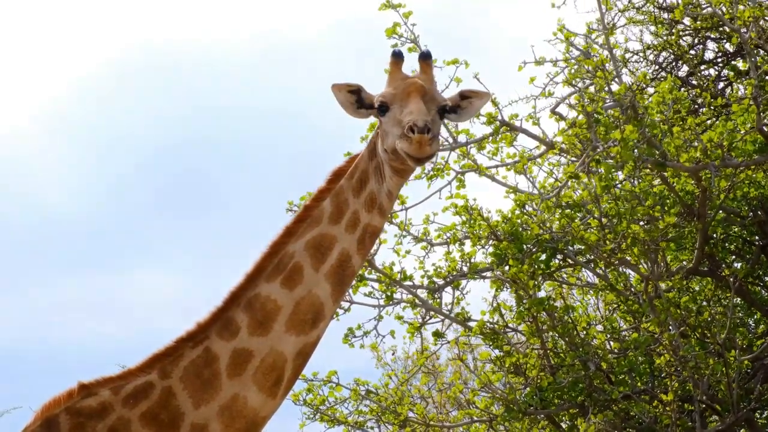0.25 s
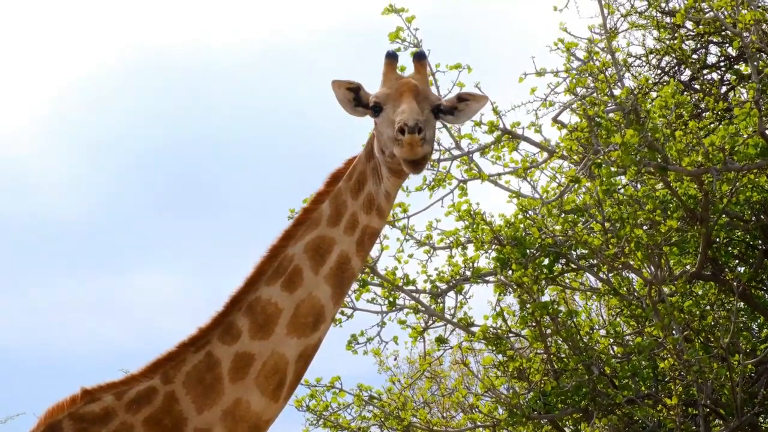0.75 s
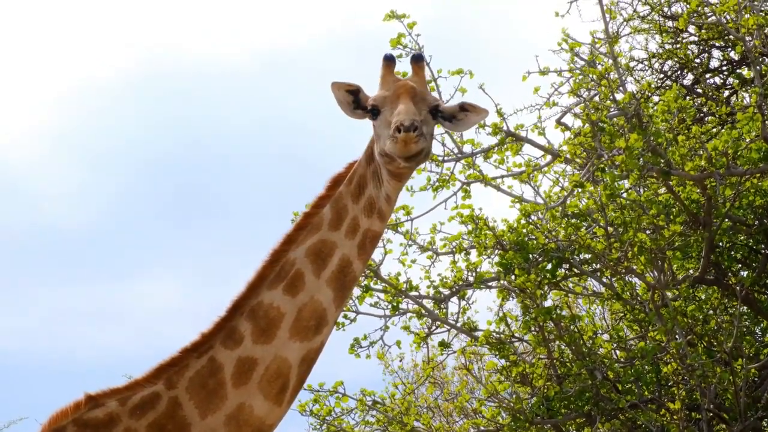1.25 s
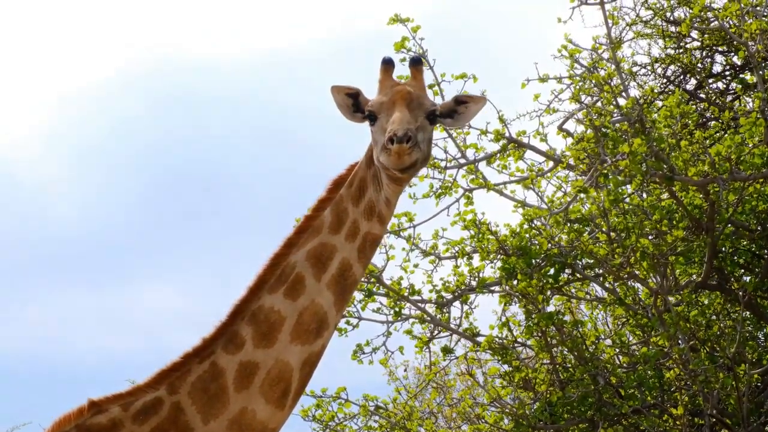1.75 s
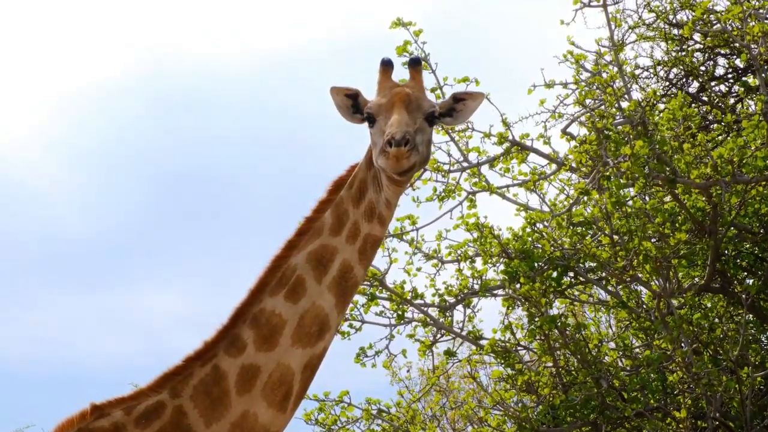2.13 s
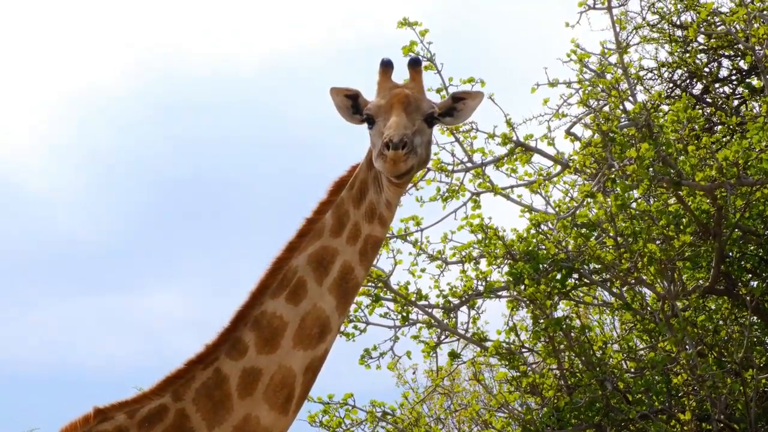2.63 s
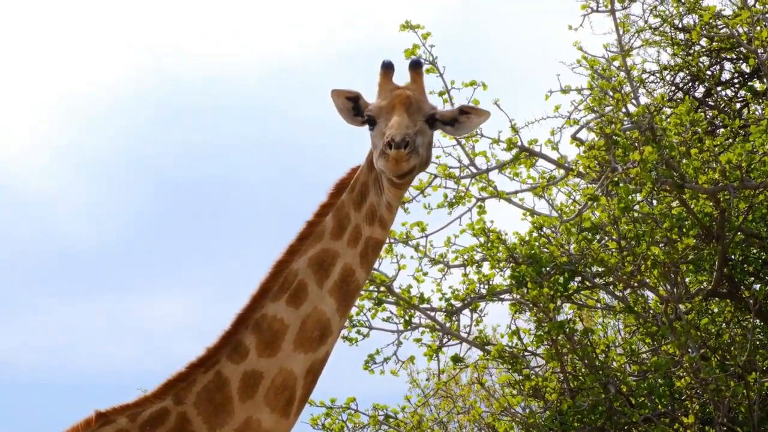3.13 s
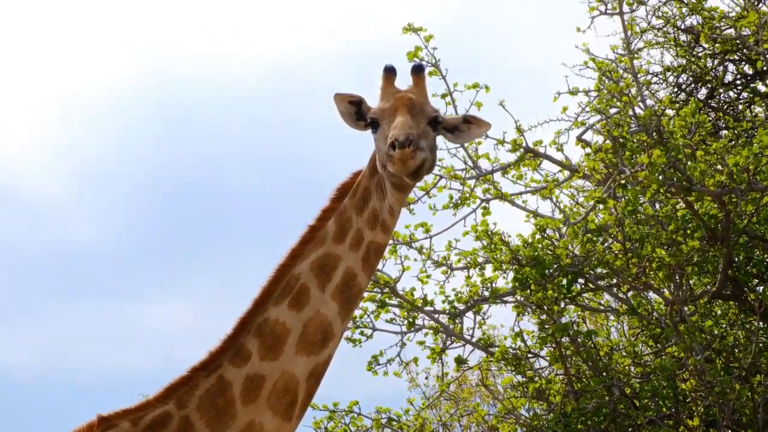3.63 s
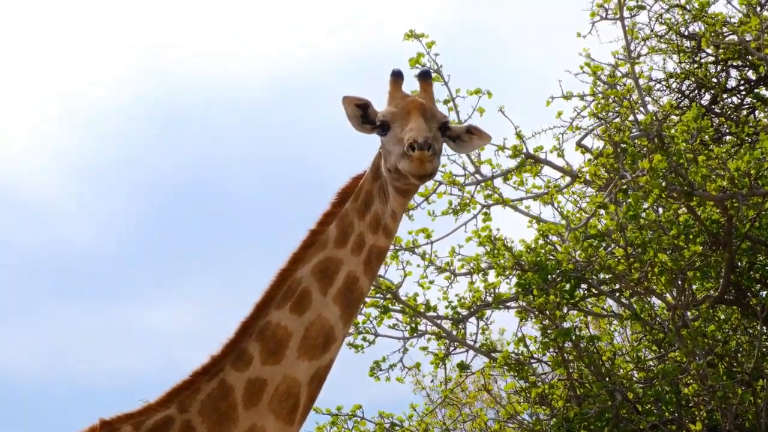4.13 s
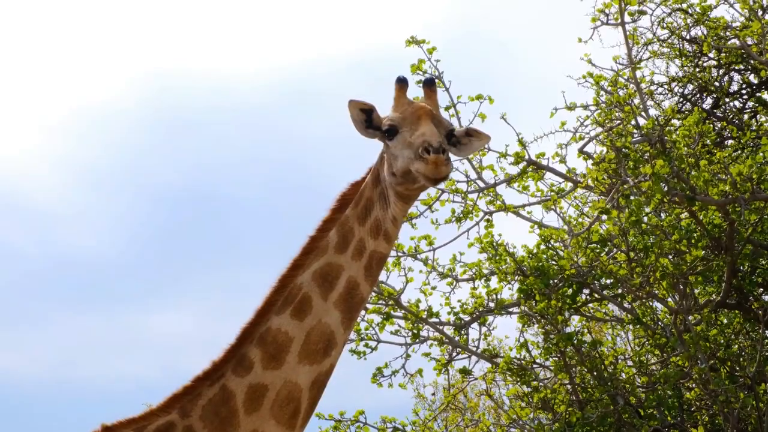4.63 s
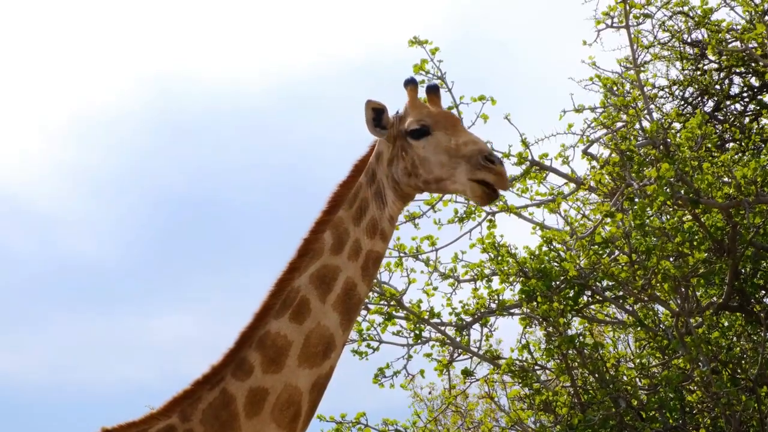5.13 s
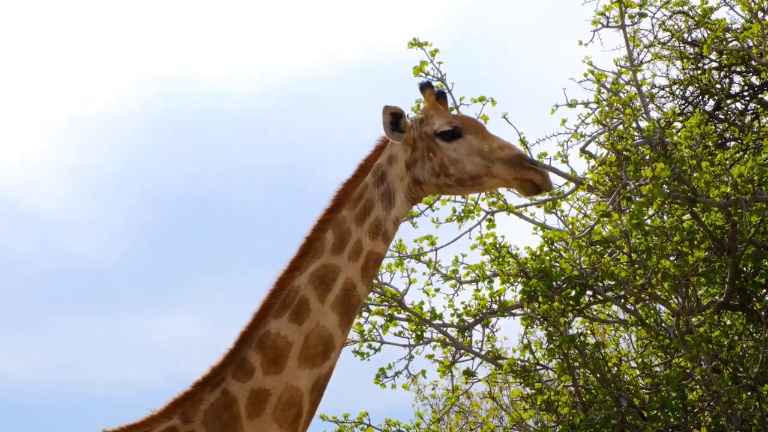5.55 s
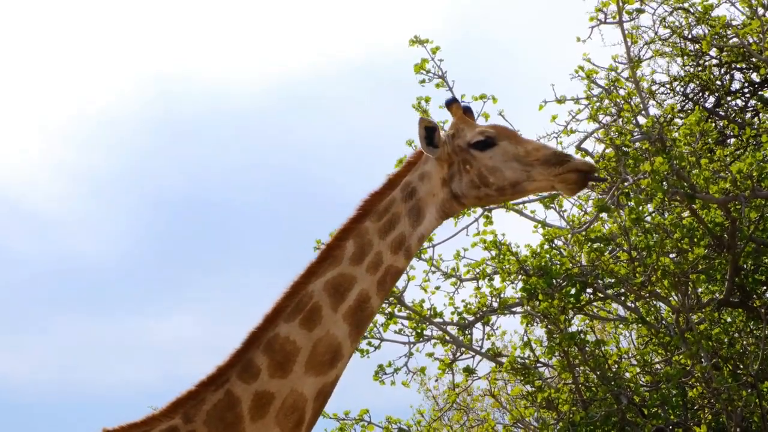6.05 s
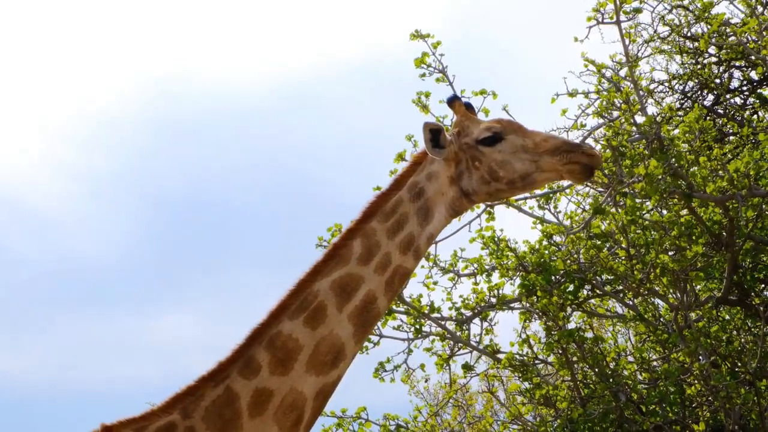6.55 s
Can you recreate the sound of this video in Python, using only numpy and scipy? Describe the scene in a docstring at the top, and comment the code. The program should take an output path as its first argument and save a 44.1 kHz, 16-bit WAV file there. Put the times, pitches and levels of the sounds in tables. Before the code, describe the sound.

A giraffe chews leaves and twigs very close to the microphone outdoors. Crackly rustling comes in quick uneven swells, with sharp ringing twig snaps, small mouth pops and dull molar crunches. The loudest cracks fall in the first two and a half seconds; then it thins to sparse ticks, with one short crunchy burst midway, and rustles again at the end. Soft low wind, faint hum and hiss lie beneath.

```python
"""Leaves rustle in swells of small crackles as a large browsing animal strips and chews them close by, outdoors.
Crackles are short bursts of noise, each around a pitch of its own; stalks and twigs snap as ringing bursts.
The jaws give dull pops (pressure pulses) and crunches (decaying noise in a resonant hollow).
Below lie a soft wind rumble with one gust, a faint hum, hiss (all shaped noise) and a thin high sine whine.
Wind rumble, hum and whine sink near the end."""
import sys
import numpy as np
from scipy import signal
from scipy.fft import rfft, irfft
from scipy.io import wavfile

SR = 44100
rng = np.random.default_rng(int(sys.argv[2]) if len(sys.argv) > 2 else 0)


def to_wav(sig):
    """Store sig (one row per channel, or 1-D mono) as 16-bit WAV at the path in sys.argv[1].

    Samples outside -1..1 are clipped; the rate is SR.
    """
    pcm = np.clip(np.atleast_2d(sig), -1, 1) * 32767
    pcm = np.round(pcm).astype(np.int16)
    wavfile.write(sys.argv[1], SR, pcm.T)  # frames by channels


N = 298998

# leaves crumpling, one swell each: [middle t/s, peak level before brightening/dB, length/s, brightness/dB]
LEAF_SWELLS = [(.06, -55, 0.68, 3.5), (0.212, -50.5, 0.13, -2), (.33, -63.5, 0.2, -0.5),
               (0.408, -57, 0.18, -6), (0.681, -60.5, 0.1, -3), (0.814, -47.5, 0.15, 0.5),
               (0.991, -51, 0.19, 3.5), (1.045, -55.5, 0.11, 0.5), (1.111, -53.5, 0.15, 3),
               (1.194, -51.5, 0.079, 3.5), (1.307, -47.5, 0.22, 1), (1.401, -47, 0.055, -1),
               (1.451, -49.5, 0.3, 2.5), (1.667, -47.5, 0.14, 1), (1.844, -54.5, 0.18, 5),
               (1.941, -58.5, 0.14, 8), (2.018, -51, 0.098, 2.5), (2.19, -50.5, 0.34, 2),
               (2.322, -50, 0.24, 2), (2.574, -43, 0.12, -4.5), (2.796, -59, 0.44, 0.5),
               (2.89, -54.5, 0.027, 1.5), (3.05, -70, 0.24, -6), (3.326, -61.5, 0.11, 5.5),
               (3.435, -51.5, 0.16, 4), (3.563, -60, 0.18, 14.5), (3.66, -62, 0.13, 6),
               (3.816, -59.5, .22, -1), (4.013, -62, 0.19, -1.5), (4.174, -52.5, .18, -2.5),
               (4.327, -60, 0.34, 10.5), (4.563, -60.5, 0.15, 0.5), (4.788, -59.5, 0.29, -5),
               (4.879, -60, .1, 8.5), (5.001, -60, 0.073, -8), (5.206, -59, 0.46, 5),
               (5.46, -66.5, 0.36, -1), (5.708, -67, 0.27, -4), (6.12, -59, 0.68, 3),
               (6.418, -49, 0.16, 1.5), (6.488, -57, .12, 2), (6.596, -49, 0.24, 1),
               (6.763, -51, 0.12, 3.5)]
# spectral density of the leaves before brightening: [f/Hz, relative density/dB]
LEAF_SPECTRUM = [(300, -3.5), (700, -6.5), (1300, -9.5), (2000, -6), (3200, -4.5), (5500, -2.5),
                 (9600, -5.5), (12500, -11), (15500, -18)]
# wind rumble: [t/s, mean level/dB]
WIND_LEVEL = [(0, -63.5), (2, -62.5), (4.2, -62), (5.7, -63), (6.28, -64), (6.34, -71), (6.78, -72)]
# spectral density of the wind rumble: [f/Hz, relative density/dB]
RUMBLE_SPECTRUM = [(20, -6), (45, 1.5), (85, 3.5), (125, -2), (190, -13.5), (330, -22), (600, -52)]
# spectral density of the hiss: [f/Hz, relative density/dB]
HISS_SPECTRUM = [(200, 1.5), (700, -8.5), (1400, -17), (1850, -2.5), (2300, -14.5), (4700, -8.5),
                 (11400, -11.5), (15500, -17.5)]
# stalks and twigs breaking: [t/s, peak level/dB, ring f/Hz, brightness/dB, decay by 60 dB/ms]
STALK_SNAPS = [(0.0167, -31, 2340, -3, 11), (0.0692, -31.5, 4200, -11, 2.8), (0.1345, -18, 4120, 0, 1.6),
               (.199, -32.5, 7320, -3, 3), (0.2352, -23, 4170, -2, 3.8), (0.7626, -27.5, 4050, 11, 2.9),
               (0.7779, -34, 1850, -13, 7), (.812, -31, 5100, -2, 12), (.8564, -25, 4900, -24, 9.2),
               (.869, -26, 4750, -7, 7.9), (.9824, -28, 4800, 4, 6.4), (1.0776, -20, 4400, -20, 6.4),
               (1.1018, -30, 8800, 8, 5), (1.128, -24, 8830, 12, 3.3), (1.136, -30, 1500, -2, 11),
               (1.1771, -19, 4300, 12, 5.4), (1.1902, -19.5, 6160, 5, 8), (1.2537, -27, 5900, 4, 3.6),
               (1.2698, -20.5, 4330, -5, 3.2), (1.3024, -23, 4800, 5, 6), (1.3056, -14, 4830, 7, 8.9),
               (1.3226, -7.5, 4300, -1, 2), (1.3274, -20, 5000, 0, 6), (1.407, -9.5, 2480, -4, 4.4),
               (1.4092, -19, 3250, 0, 12), (1.4301, -23, 3800, -15, 5.9), (1.4591, -16.5, 4400, 3, 17),
               (1.4813, -27, 3830, -6, 15), (1.5498, -32, 2440, -3, 7), (1.5943, -22.5, 3180, -4, 6.1),
               (1.609, -29, 6560, -9, 3.8), (1.6466, -32.5, 8530, -3, 7.7), (1.7, -32.5, 3400, 2, 5.5),
               (1.9474, -31, 6050, 18, 18), (2.152, -27, 5460, 8, 5.7), (2.18, -27, 4800, 6, 9.2),
               (2.1994, -25, 4550, 1, 6), (2.2112, -7.5, 9270, 15, 13.3), (2.2203, -24, 8800, 15, 36),
               (2.278, -25, 7100, 14, 8), (2.2821, -12, 8600, 20, 1.4), (2.291, -27, 8700, 9, 3),
               (2.299, -29, 2800, -13, 8), (2.37, -36, 2030, 7, 7.9), (2.3877, -9.5, 7300, -12.5, 6.4),
               (2.5328, -28, 2230, 8, 14), (2.555, -27.5, 6470, 10, 31), (2.637, -26.5, 5570, -1, 2.2),
               (2.7931, -35.5, 3700, -22, 7.4), (3.2826, -37, 6070, -10, 4),
               (3.3092, -21.5, 5250, -28, 2.8), (3.3874, -25.5, 5450, -15, 3.4),
               (3.4107, -33.5, 3240, -16, 4.8), (3.462, -25, 2140, -9, 3.7), (3.5358, -24.5, 3700, 5, 14),
               (3.5548, -15, 3300, 6, 5), (3.5594, -16.5, 3520, 10, 12), (3.5705, -15.5, 3280, 8, 7),
               (3.666, -36.5, 5600, 11, 15), (4.1127, -38, 3270, -20, 7), (4.1408, -34, 5500, 6, 2.6),
               (4.31, -37, 6330, 8, 3.3), (4.3174, -26.5, 5900, -8, 5), (4.3953, -35, 8000, 13, 3.9),
               (4.4385, -36, 4440, -15, 8.1), (4.4818, -30, 5450, 17, 3.5), (4.69, -39, 7200, 12, 2.2),
               (4.8794, -35, 4000, -4, 5.1), (5.179, -32.5, 7000, -8, 4), (5.2003, -34, 5550, -18, 3.3),
               (5.2649, -27, 4830, -14, 7.9), (5.2813, -20, 5300, 2, 2.4), (5.338, -34.5, 2500, -6, 1.2),
               (5.554, -38.5, 4000, 0, 4), (5.9381, -32, 3000, 20, 5.1), (6.0067, -35, 4870, -24, 2.8),
               (6.0738, -36, 2930, -19, 1.6), (6.1313, -34, 3100, 8, 3), (6.1499, -32.5, 2070, 16, 1.8),
               (6.1828, -24, 3830, -15.5, 4.6), (6.228, -21.5, 4770, -16, 9), (6.2776, -32, 2260, 10, 12),
               (6.3369, -21.5, 4600, 2, 5.6), (6.353, -26.5, 3360, 2, 4.7), (6.3615, -35, 4480, 8, 5),
               (6.3841, -15, 2440, -11, 1.2), (6.5613, -33, 4480, -9, 5), (6.6579, -34, 3750, -3, 4.6)]
# dull pops in the mouth: [t/s, peak level/dB]
MOUTH_POPS = [(.0812, -37.5), (0.1094, -37.5), (0.1782, -30), (.7624, -25.5), (0.896, -42), (0.9831, -31.5),
              (1.136, -25), (1.2944, -29), (1.3489, -30), (1.4088, -31), (1.55, -33.5), (1.685, -30.5),
              (2.2727, -31), (3.3086, -37), (4.3494, -32.5), (5.0799, -43.5), (5.1782, -35), (5.2628, -37),
              (6.278, -32), (6.3374, -33), (6.353, -32.5), (6.4445, -39.5)]
# mouthfuls crushed between the molars: [t/s, peak level/dB, hollow f/Hz, decay by 60 dB/ms]
MOLAR_CRUNCHES = [(1.306, -48, 700, 24), (1.322, -26, 700, 29), (1.461, -43, 460, 15),
                  (1.638, -47, 627, 140), (1.849, -42, 600, 146), (2.021, -47, 486, 150),
                  (2.2411, -37, 316, 70), (2.243, -36, 134, 77), (2.211, -36, 900, 26),
                  (2.387, -38, 487, 7.9), (2.548, -47.5, 412, 66), (2.583, -38, 1020, 53),
                  (3.556, -37.5, 1190, 15), (3.576, -38, 1280, 18)]

SWELL_EDGE_DB, RISE_SHARE = 14.5, 0.52   # a swell starts and ends this far under its peak; share spent rising
SWELL_SQUARENESS = 1.9   # higher holds the peak longer and drops faster
STILL_DB, STILL_BRIGHT_DB = -76, -0.5   # leaves between the swells
HUM_HZ, HUM_DB, HUM_DROP_DB = 120, -69, 19
WHINE_HZ, WHINE_DB, WHINE_DROP_DB = 15732, -69, 6
TONES_END_S, TONES_FADE_S = 6.3, .03   # hum and whine sink by their drops
HISS_DB = -69.5
LEAD_IN_MS, LEAD_IN_DB, LEAD_IN_DB_PER_MS = 12, -23.5, 4.5   # noise swells for a few ms before each snap
SECOND_MS, SECOND_DB = 4.3, -16   # mean delay and level of the weaker crack after each break
GUST_S, GUST_DB, GUST_HZ = 4.02, -52, 71   # one gust thumps on the microphone
GUST_RISE_S, GUST_HOLD_S, GUST_DB_PER_S = .012, .13, 80   # the hold is counted from the onset
CUTOFF_HZ = 16800   # 60 dB down from here up


def from_db(db):
    """Logarithmic level: amplitude gain is ten to the power of dB / 20."""
    return 10 ** (np.asarray(db) / 20)


def rms_one(x):
    """Normalisation: scales to unit root mean square."""
    return x / np.sqrt(np.mean(x ** 2) + 1e-20)


def in_time(rows):
    """Linear interpolation: each column of a curve table, one value per sample."""
    t, *columns = np.transpose(rows)
    return [np.interp(np.arange(N) / SR, t, column) for column in columns]


def drift(rate_hz):
    """Low-pass random fluctuation: noise through two equal poles, with unit rms."""
    step = 40   # samples between the slow values
    pole = np.exp(-2 * np.pi * rate_hz * step / SR)
    noise = rng.standard_normal(N // step + 2002)
    slow = signal.lfilter([1], [1, -2 * pole, pole * pole], noise)[2000:]   # settled part
    return np.interp(np.arange(N) / step, np.arange(len(slow)), rms_one(slow))


def coloured(x, spectrum):
    """Spectral shaping: weights each frequency of a noise by a density curve over log frequency."""
    hz, db = np.transpose(spectrum)
    log_hz = np.log(np.linspace(1, SR / 2, N // 2 + 1))
    return irfft(rfft(x) * from_db(np.interp(log_hz, np.log(hz), db)), N)


def resonance(x, hz, width_hz):
    """Damped resonance: a pole pair whose radius sets the bandwidth, with unit gain at the peak."""
    radius = np.exp(-np.pi * width_hz / SR)
    zeros = np.array([1, 0, -1]) * (1 - radius * radius) / 2
    poles = [1, -2 * radius * np.cos(2 * np.pi * hz / SR), radius * radius]
    return signal.lfilter(zeros, poles, x)


def brightened(x, bright_db):
    """Complementary band splitting: lifts or lowers what a 5.5 kHz low-pass leaves over."""
    low = signal.sosfilt(signal.butter(2, 5500, fs=SR, output="sos"), x)
    return low + from_db(bright_db) * (x - low)


def crumpling():
    """Power addition: overlapping rounded swells and near stillness give the leaves' level and brightness."""
    middle, peak_db, length, bright_db = np.transpose(LEAF_SWELLS)[:, :, None]
    t = np.arange(0, N, 64) / SR
    late = t - middle
    along = late / (length * np.where(late < 0, RISE_SHARE, 1 - RISE_SHARE))   # -1 and 1 at the edges
    power = from_db(2 * (peak_db - SWELL_EDGE_DB * abs(along) ** SWELL_SQUARENESS))
    still = from_db(2 * STILL_DB)
    total = power.sum(axis=0) + still
    brightness = ((power * bright_db).sum(axis=0) + still * STILL_BRIGHT_DB) / total
    return in_time(np.transpose([t, 10 * np.log10(total), brightness]))


def rustle(per_s, spread_db, burst_ms, smooth_db, flicker_db, patchy_db):
    """Crackling noise: each crease that gives way opens a short burst at its own pitch, over smooth friction."""
    level_db, bright_db = crumpling()
    power = from_db(2 * spread_db * np.minimum(rng.exponential(1, N), 4))
    pace = from_db(.6 * np.clip(level_db + 52.5, -18, 6))   # gentle movement breaks up into lone ticks
    clumps = from_db(4 * drift(25))
    born = rng.random(N) < per_s * pace * clumps / SR
    pitches = np.geomspace(1200, 11000, 7)
    dealt = rng.integers(0, 7, N)
    fade = np.exp(-1000 / (burst_ms * SR))   # power decay per sample
    friction = from_db(smooth_db + flicker_db * drift(40))
    leaves = 0
    for k, hz in enumerate(pitches):
        burst_power = signal.lfilter([1], [1, -fade], power / pace * born * (dealt == k) + 1e-18)
        crackle = rms_one(np.sqrt(burst_power))
        excited = (crackle + friction) * rng.standard_normal(N)
        pitched = resonance(excited, hz, hz) * np.sqrt(6000 / hz)
        patch = from_db(patchy_db * drift(11.8))   # leaves of each size move in their own time
        leaves = leaves + patch * (0.46 * excited + pitched)
    return from_db(level_db) * brightened(rms_one(coloured(leaves, LEAF_SPECTRUM)), bright_db)


def wind_rumble():
    """Low-frequency noise: a falling spectrum whose level wavers makes the wind lumpy."""
    level_db, = in_time(WIND_LEVEL)
    rumble = rms_one(coloured(rng.standard_normal(N), RUMBLE_SPECTRUM))
    return from_db(level_db + 0.72 * drift(5.6)) * rumble


def tones_sunk():
    """Linear ramp: share, 0 to 1, of the late drop in hum and whine."""
    return np.clip((np.arange(N) / SR - TONES_END_S) / TONES_FADE_S, 0, 1)


def hum():
    """Narrow-band noise: a sharp resonance turns noise into a wavering tone."""
    return from_db(HUM_DB - HUM_DROP_DB * tones_sunk()) * rms_one(resonance(rng.standard_normal(N), HUM_HZ, 3))


def hiss():
    """Broadband noise: a shaped spectrum with a slowly drifting level."""
    return from_db(HISS_DB + 2.9 * drift(12)) * rms_one(coloured(rng.standard_normal(N), HISS_SPECTRUM))


def whine():
    """Amplitude and phase modulation: slow drifts unsettle a high sine."""
    level_db = WHINE_DB - WHINE_DROP_DB * tones_sunk() + 3.2 * drift(14)
    phase = 2 * np.pi * WHINE_HZ * np.arange(N) / SR + 1.1 * drift(22)
    return from_db(level_db) * np.sqrt(2) * np.sin(phase)


def snaps(broad_db, tail_db, tail_t60_ms):
    """Brittle fracture: a short noise ramp leads into a ringing crack, a weaker one, then softer tearing."""
    length = 2500   # samples
    out = np.zeros(N + length)
    ms = np.arange(length) * 1000 / SR - LEAD_IN_MS   # 0 at the break
    after = np.maximum(ms, 0)
    lead_in = from_db(LEAD_IN_DB + LEAD_IN_DB_PER_MS * ms)
    tearing = from_db(tail_db - 60 * after / tail_t60_ms)
    sharp_onset = 1 + 0.44 * np.exp(-after / 0.21)
    for s, peak_db, hz, bright_db, t60_ms in STALK_SNAPS:
        late, strong = rng.standard_normal(2)
        again = ms - SECOND_MS * (1 + 0.054 * late)
        first = from_db(-60 * after / t60_ms) * sharp_onset
        second = (again > 0) * from_db(SECOND_DB + 1.4 * strong - 60 * abs(again) / t60_ms)
        crack = rng.standard_normal(length) * np.where(ms < 0, lead_in, first + tearing + second)
        band = signal.butter(3, [1000 + 0.11 * hz, 11000], "band", fs=SR, output="sos")
        broad = brightened(signal.sosfilt(band, crack), bright_db)
        stalk = resonance(crack, hz, 400 + 0.16 * hz)
        snap = stalk / abs(stalk).max() + from_db(broad_db) * broad / abs(broad).max()
        start = max(round((s - LEAD_IN_MS / 1000) * SR), 0)
        out[start:][:length] += from_db(peak_db) * snap / abs(snap).max()
    return out[:N]


def pops(push_ms):
    """Impulsive pressure: each pop is a one-sided Gaussian push or pull."""
    s, peak_db = np.transpose(MOUTH_POPS)
    pushes = np.zeros(N)
    pushes[(s * SR).astype(int)] = rng.choice([-1, 1], len(s)) * from_db(peak_db)
    ms = np.arange(-80, 81) * 1000 / SR
    return np.convolve(pushes, np.exp(-.5 * (ms / push_ms) ** 2), "same")


def crunches(body_db):
    """Cavity resonance: dying dull noise rings in the hollow of the mouth."""
    length = 4000   # samples
    out = np.zeros(N)
    ms = np.arange(length) * 1000 / SR
    dull = signal.butter(2, [90, 1300], "band", fs=SR, output="sos")
    for s, peak_db, hz, t60_ms in MOLAR_CRUNCHES:
        crush = rng.standard_normal(length) * from_db(-60 * ms / t60_ms)
        hollow = rms_one(resonance(crush, hz, 0.25 * hz))
        sound = hollow + from_db(body_db) * rms_one(signal.sosfilt(dull, crush))
        out[round(s * SR):][:length] += from_db(peak_db) * sound / abs(sound).max()
    return out


def gust():
    """Narrow-band low noise under an envelope: sets in fast, holds and dies exponentially."""
    late = np.arange(N) / SR - GUST_S
    decay = from_db(-GUST_DB_PER_S * np.maximum(late - GUST_HOLD_S, 0))
    shape = np.clip(late / GUST_RISE_S, 0, 1) * decay
    low = resonance(resonance(rng.standard_normal(N), GUST_HZ, 41), GUST_HZ, 42)
    held = low[(late > 0) & (late < GUST_HOLD_S)]
    return from_db(GUST_DB) * shape * low / np.sqrt(np.mean(held ** 2))


def scene():
    """Superposition: the pressures of all sources add in one channel."""
    leaves = rustle(per_s=900, spread_db=4.5, burst_ms=0.54, smooth_db=-3.5, flicker_db=1.5, patchy_db=2.0)
    background = wind_rumble() + hum() + hiss() + whine()
    breaks = snaps(broad_db=-3.0, tail_db=-26.0, tail_t60_ms=95.0)
    mouth = pops(push_ms=0.11) + crunches(body_db=-4.0)
    return (leaves + background + breaks + mouth + gust())[None]


def record(dry):
    """Band limitation: the microphone loses the deepest bass; the treble steps down, then is cut."""
    x = signal.sosfilt(signal.butter(2, 40, "high", fs=SR, output="sos"), dry)
    x = signal.sosfilt(signal.ellip(5, .5, 12, 15850, fs=SR, output="sos"), x)   # step of at least 12 dB
    return signal.sosfilt(signal.cheby2(12, 60, CUTOFF_HZ, fs=SR, output="sos"), x)


dry = scene()
out = record(dry)
to_wav(out)
```